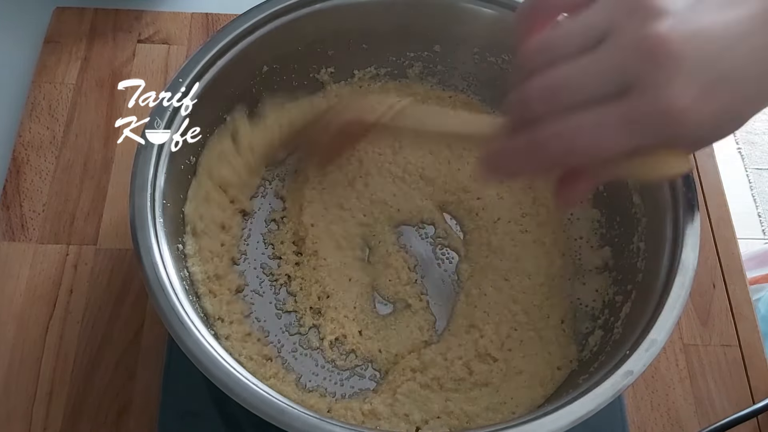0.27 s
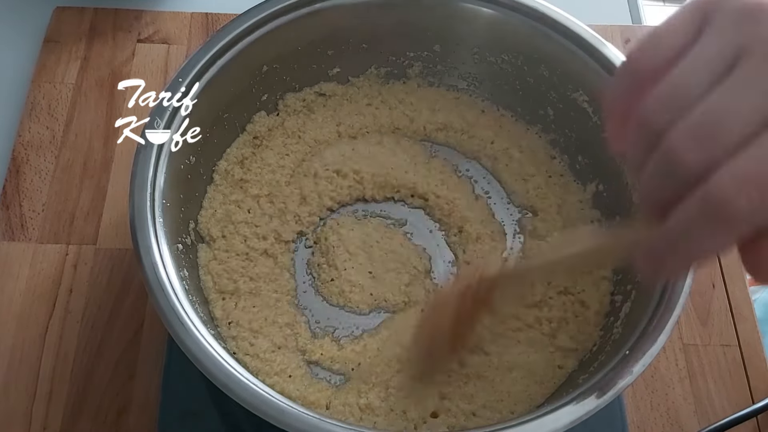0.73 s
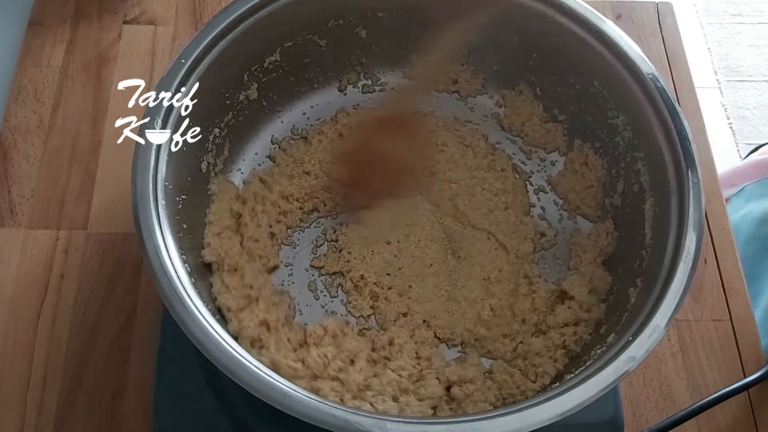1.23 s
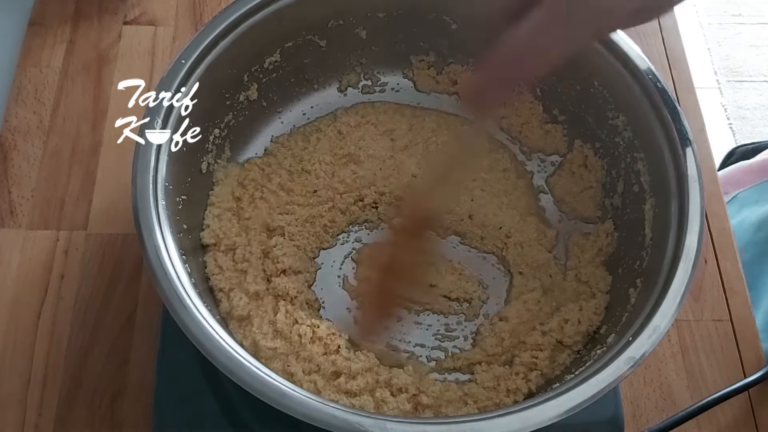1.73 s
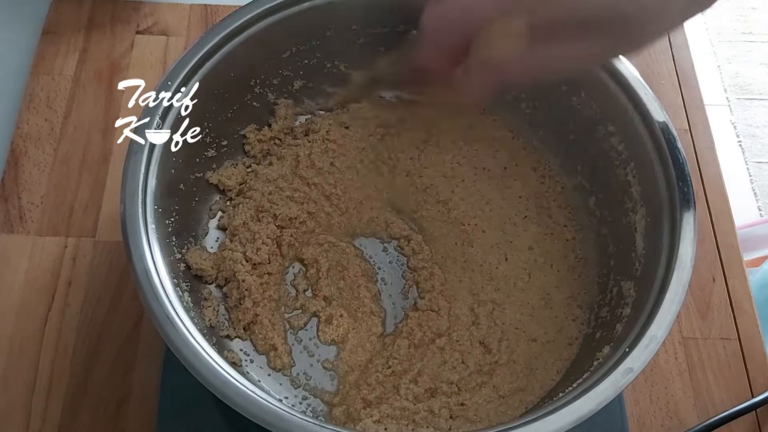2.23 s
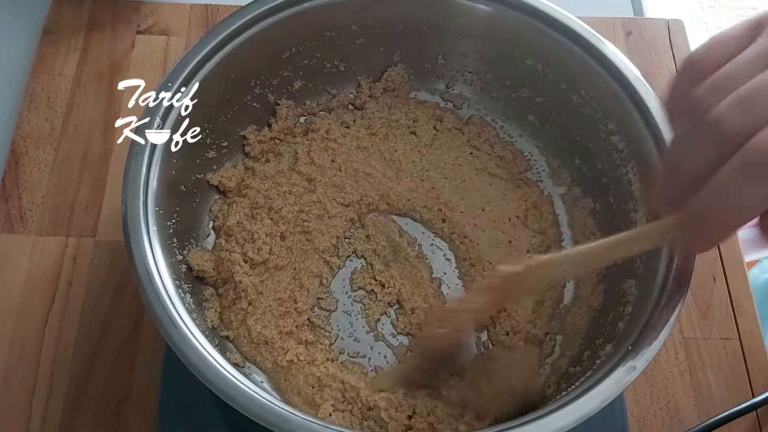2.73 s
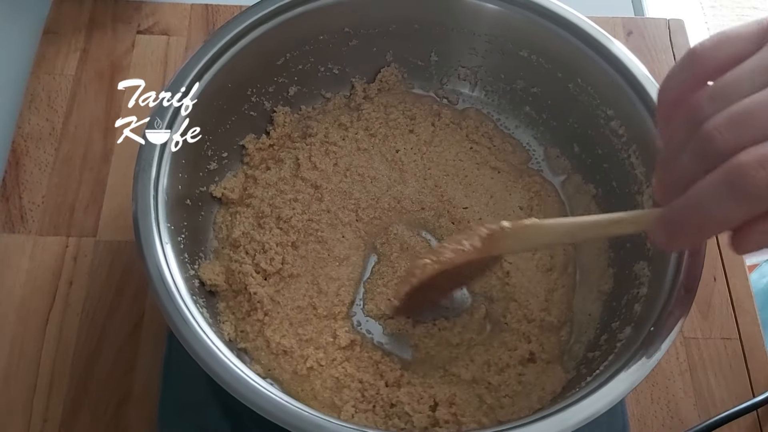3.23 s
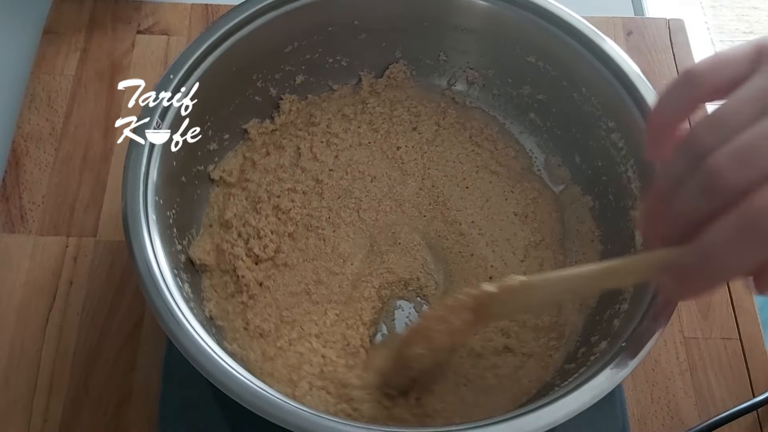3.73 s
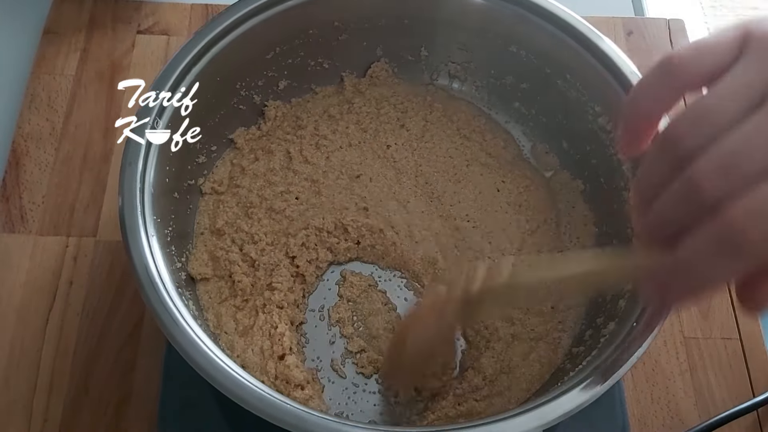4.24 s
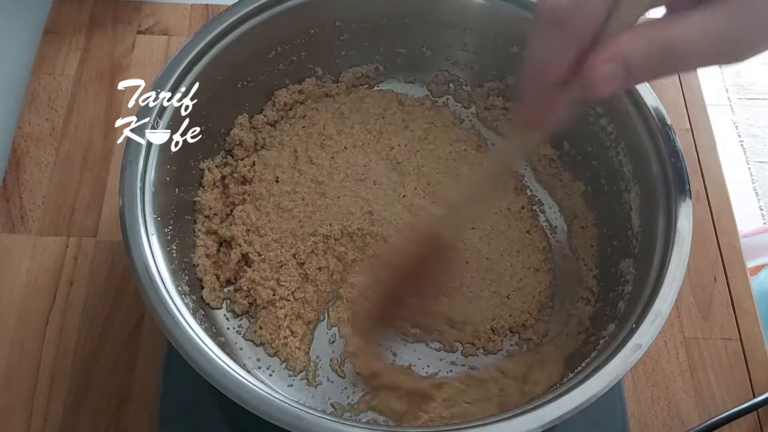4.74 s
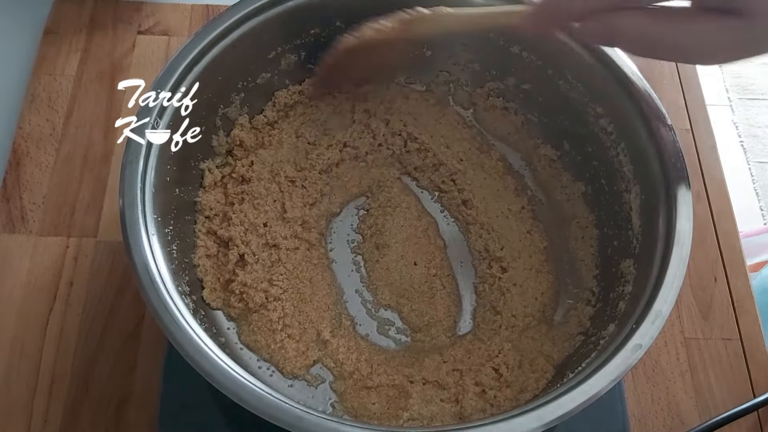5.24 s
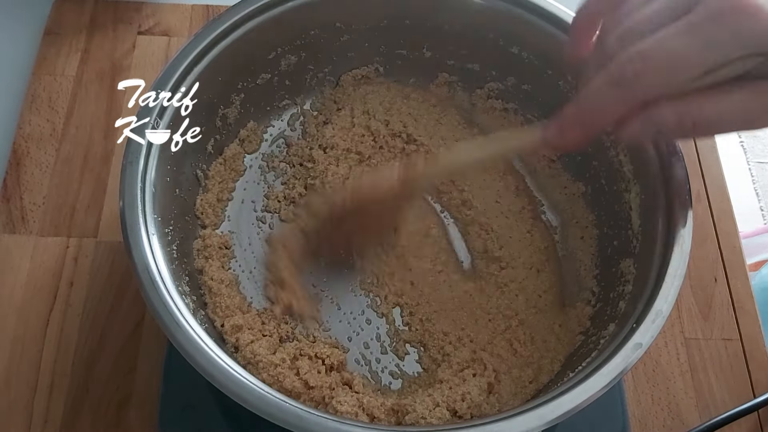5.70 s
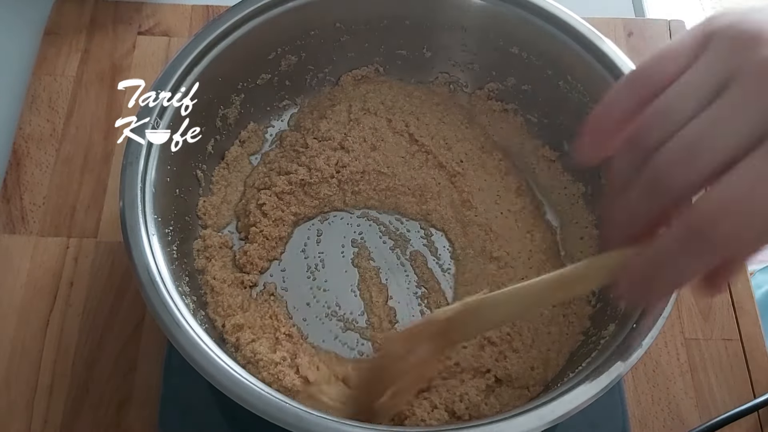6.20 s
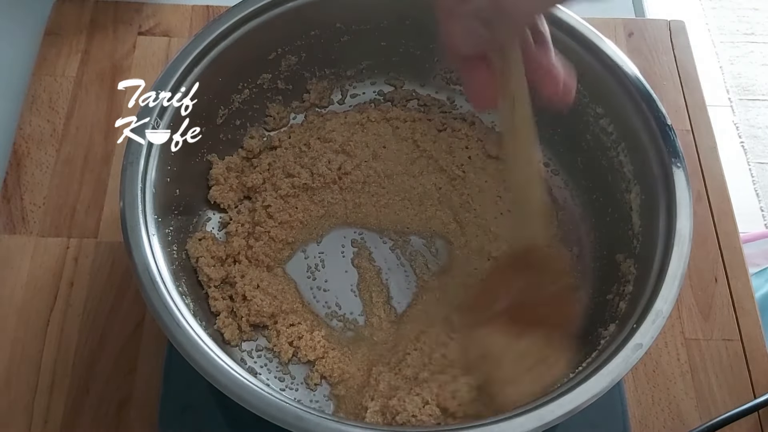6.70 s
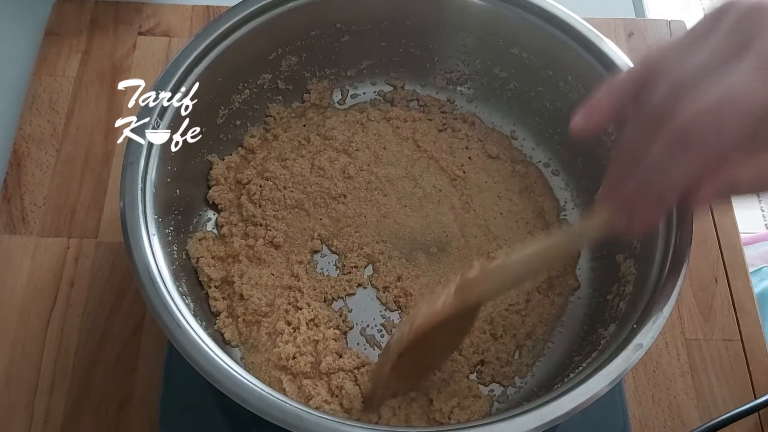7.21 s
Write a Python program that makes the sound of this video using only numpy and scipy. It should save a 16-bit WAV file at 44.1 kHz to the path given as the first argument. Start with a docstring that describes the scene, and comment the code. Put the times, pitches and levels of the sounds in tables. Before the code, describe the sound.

Butter sizzles close by in a steel pot throughout, a fine fizz that flares as a wooden spoon turns toasting semolina onto the hot metal. Short grainy rasps and light knocks fill the first second and a half. From about 1.1 to 1.7 seconds, a soft low draught brushes the right side of the microphone. Grit scrapes on bare steel around 2.4 seconds. The sizzle eases between 3 and 4 seconds, where the strongest dull bump lands at 3.3 with a brief juddering groan, followed by low rubbing. At 4.4 the handle clacks sharply on the rim and the sizzle surges. Another low judder at 5.2 leads into a second clack and bump at 5.3. Stirring continues with small ticks, a firm thud at 6.3, a gritty scrape around 6.6 and a softer knock at 7.3. The small kitchen adds a short ring.

```python
"""Butter sizzles close by in a steel pot as a wooden spoon stirs toasting semolina.
Steam bubbles simmer throughout and flare wherever the spoon turns fresh paste onto hot steel.
Grain rasps under the spoon, which drags and judders over the bottom, bumps the wall and
twice clacks on the rim. A draught brushes the right microphone port; a small kitchen rings."""
import sys
import numpy as np
from scipy import signal
from scipy.fft import rfft, irfft
from scipy.io import wavfile

SR = 44100
rng = np.random.default_rng(int(sys.argv[2]) if len(sys.argv) > 2 else 0)


def inscribe(sig):
    """Save sig as 16-bit PCM at rate SR to the path in sys.argv[1].

    A 1-D sig is mono; a 2-D sig holds one channel per row.
    Samples are clipped to [-1, 1] before scaling.
    """
    pcm = np.round(np.clip(np.atleast_2d(sig).T, -1, 1) * 32767)
    wavfile.write(sys.argv[1], SR, pcm.astype(np.int16))


N = 328986
T = np.arange(N) / SR

# spectra of the noise sources: (frequency [Hz], relative density [dB])
SIZZLE_SPECTRUM = [(240, -23.5), (400, 5), (496, -5), (597, 0), (932, -8.5), (1700, -3), (2500, -5.5),
                   (4340, -4), (6000, -4), (7300, -1.5), (8670, -4.5), (12700, -1.5), (15800, -4.5)]
SIMMER_SPECTRUM = [(300, 12), (900, -4.5), (3000, -12), (5000, -2.5), (6600, 1.5), (8200, 3), (11000, 3.5),
                   (15800, 1)]
DRAG_SPECTRUM = [(30, -35), (60, -11), (100, 8), (135, 1.5), (225, -5), (330, 4.5), (410, -5), (490, -10.5),
                 (680, -15.5), (1100, -41)]
CLACK_SPECTRUM = [(300, -2.5), (1000, -15), (4600, -10.5), (5600, -5), (6500, 3), (7500, 4), (8500, -2.5),
                  (14000, -8)]
TICK_SPECTRUM = [(300, 12.5), (900, 1.1), (2000, 13), (3200, 8), (4600, 9.9), (9000, 7.5), (15800, 2.8)]
DRAUGHT_SPECTRUM = [(20, -40), (55, 1.5), (80, -1.5), (120, -1.5), (185, -13), (400, -35.5), (1500, -75.5)]
# simmer resonances: (centre [Hz], width [Hz], gain [dB])
SIMMER_PEAKS = [(1720, 320, -2), (4290, 280, 3.5), (7414, 150, 12.5), (14500, 600, -7)]
# modes of the pot on its base and of its steel wall: (frequency [Hz], level [dB], t60 [s])
POT_MODES = [(97, -27, 0.16), (136, -22, 0.16), (191, -27.5, 0.17), (257, -14.5, 0.047), (312, 0, 0.075),
             (354.4, -4, 0.096), (416, -9.5, 0.092), (465, -11, 0.1), (532, -8, 0.12), (599, -7.5, 0.13),
             (679, -4, 0.089), (760, -5.5, .06), (1220, -4, 0.045)]
WALL_MODES = [(845, -12, .25), (1477, -10, .33), (1716, -12, .2), (2352, -11, .3), (2730, -15, .18),
              (3270, -13, .16), (4043, -12, .16), (5488, -11, .2), (5838, -9, .24), (6105, -9, .26),
              (6330, -11, .22), (6885, -9, .2), (7200, -10, .2), (7719, -8, .18)]

# Event levels are relative within each table; sigma is the half length of a Gaussian swell.
# air on the right port: (centre time [s], level [dB], sigma [s])
AIR_PUFFS = [(1.127, -32, 0.012), (1.244, -30.5, 0.028), (1.347, -25, 0.012), (1.417, -23.5, 0.02),
             (1.492, -35.5, 0.088), (1.666, -25.5, 0.023)]
# spoon turns fresh paste onto hot steel: (start [s], rise [s], length [s], sizzle level [dB])
SPOON_SWEEPS = [(0.0, 0.034, 0.2, -50), (0.223, 0.12, 0.2, -45), (0.445, 0.07, 0.62, -49),
                (1.104, 0.02, 0.57, -47), (1.728, 0.19, 0.27, -46), (2.172, 0.033, 0.32, -46.5),
                (2.525, 0.049, 0.37, -50.5), (3.29, 0.17, 0.67, -59.5), (3.855, 0.06, 0.24, -54),
                (4.106, 0.064, 0.13, -51), (4.349, 0.038, 0.43, -45.5), (4.803, 0.068, 0.28, -48.5),
                (5.334, 0.014, 0.095, -47), (5.45, 0.017, 0.34, -53.5), (5.702, 0.033, 0.24, -52),
                (5.946, 0.15, 0.14, -50.5), (6.13, 0.13, 0.28, -50.5), (6.378, 0.14, 0.41, -48),
                (7.029, 0.03, 0.089, -52.5), (7.279, 0.046, 0.14, -51.5)]
# grit on bare steel: (centre time [s], level [dB], sigma [s], pitch [Hz])
GRIT_SCRAPES = [(1.28, -56, 0.16, 5400), (1.33, -52.5, 0.11, 12000), (2.37, -51.5, 0.18, 5860),
                (2.46, -45, .022, 10900), (4.47, -47, 0.067, 5940), (5.78, -57.5, 0.15, 5670),
                (6.63, -50.5, 0.16, 6360), (6.64, -46, .06, 11000)]
# grain under the spoon: (centre time [s], level [dB], sigma [s], pitch [Hz], width [Hz])
GRAIN_RASPS = [(0.123, -45.5, 0.013, 1480, 1200), (0.186, -42.5, 0.026, 1750, 850),
               (0.327, -49, 0.036, 1600, 1790), (0.44, -45.5, 0.042, 1200, 1000),
               (0.555, -46, .011, 750, 990), (0.725, -44, 0.023, 1220, 1700),
               (0.801, -41, 0.018, 1860, 690), (1.31, -46.5, 0.016, 1800, 447),
               (1.601, -40, 0.013, 2950, 600), (2.05, -51, 0.011, 2750, 350),
               (2.448, -47, 0.024, 4420, 400), (2.822, -62, .07, 1230, 1200), (3.62, -66, 0.2, 770, 300),
               (3.55, -63, 0.04, 1900, 700), (3.927, -51.5, 0.02, 2450, 1190),
               (4.223, -52.5, 0.026, 1850, 1230), (4.816, -49, 0.02, 1270, 150)]
# harder rubs over the bottom: (centre time [s], level [dB], sigma [s])
SPOON_RUBS = [(1.063, -52.5, 0.61), (1.795, -49.5, 0.049), (2.416, -47.5, 0.12), (2.834, -48.5, 0.1),
              (3.5, -47, 0.15), (3.825, -44.5, 0.1), (4.164, -47, 0.1), (4.53, -45, 0.061),
              (4.772, -45, 0.075), (5.47, -44, 0.089), (6.056, -49, 0.076), (6.45, -49.5, 0.19),
              (6.733, -46.5, 0.1)]
# stick-slip groans: (centre time [s], level [dB], sigma [s], slip rate [Hz])
SPOON_JUDDERS = [(3.3, -34.5, 0.029, 135), (3.52, -43, 0.03, 335), (5.204, -46, 0.062, 95)]
# spoon hits the pot: (time [s], level [dB], contact [ms], ring pitch [Hz], rebound level [dB])
SPOON_BUMPS = [(0.300, -32, 2.1, 313.4, -2), (0.9014, -32, 0.47, 313.7, -1), (1.423, -32.5, 1.9, 322.6, -2),
               (1.476, -31.5, 1.15, 309.6, -1.5), (2.231, -40.5, 0.64, 321, -2),
               (2.669, -36.5, 0.95, 318.6, -7), (3.259, -17.5, 2.84, 320.6, -7),
               (4.380, -29, 0.6, 314, -3.5), (4.4085, -26.5, 2.2, 311, -4), (4.714, -37.5, 1.5, 321, -5),
               (5.368, -26, 2.04, 310.5, -6.5), (5.975, -32, 2.8, 328, -11.5),
               (6.311, -22.5, 2.35, 313, -3.5), (6.524, -38.5, 1.5, 339, -4.5),
               (7.326, -30.5, 2.2, 334, -5.5)]
# rebounds after each bump: (delay [ring cycles], level [dB])
SPOON_REBOUNDS = [(3, -3), (8, 0), (11, -1), (17, -6)]
# handle on the rim: (time [s], level [dB], decay [ms], pitch [Hz])
RIM_CLACKS = [(4.378, -15, 7.3, 5500), (4.384, -22.5, 6.1, 6330), (5.3411, -14, 3.1, 6700),
              (5.345, -20.5, 5.1, 7000)]
# spoon edge on bare steel: (time [s], level [dB], decay [ms])
EDGE_TICKS = [(0.542, -31, 4.5), (1.454, -30, 3.2), (2.665, -35.5, 7.2), (5.746, -39.5, 8.4),
              (6.305, -34, 12), (7.148, -33.5, 8.1)]
# brief dips in overall level: (centre time [s], depth [dB], sigma [s])
LEVEL_DIPS = [(5.463, 11, 0.0022), (7.016, 9.5, 0.0039)]

HOLLOW_HZ, HOLLOW_WIDTH_HZ = 638, 54  # air resonance in the pot
POT_RING_HZ = 312  # main pot mode
DRYING_DB_PER_S, RESTING_CRACKLE_DB = 71.5, -68
GLIDE_DB = -54.5
FORCE_LEAD_S, MIN_REBOUND_CONTACT_MS = .005, 1.65
RIGHT_LAG_SAMPLES = 7
LOW_CUT_HZ, HIGH_CUT_HZ = 42, 15850


def undb(db):
    """Decibels to gain."""
    return np.exp(np.asarray(db) * (np.log(10) / 20))


def unit_rms(x):
    """Scale to rms 1."""
    return x / np.sqrt(np.mean(x ** 2))


def pan(db):
    """Stereo gains for a left-minus-right level."""
    return undb(np.array([[db], [-db]]) / 2)


def convolve(x, response):
    """Apply an impulse response; at most N samples."""
    return signal.fftconvolve(np.atleast_2d(x), np.atleast_2d(response), axes=1)[:, :N]


def colour(x, spectrum, size=4096):
    """Minimum-phase filter of unit power through (Hz, dB) points."""
    hz, db = np.transpose(spectrum)
    bins_hz = np.maximum(np.arange(size // 2 + 1) * SR / size, 1)
    gain = undb(np.interp(np.log(bins_hz), np.log(hz), db))
    cepstrum = irfft(np.log(gain))
    response = irfft(np.exp(rfft(2 * cepstrum[:size // 2], size)))
    return convolve(x, response / np.linalg.norm(response))


def band(x, hz, width_hz):
    """One resonance, gain 1 at centre."""
    return signal.lfilter(*signal.iirpeak(hz, hz / width_hz, fs=SR), x)


def modal_response(modes, twist_rad):
    """Decaying modes of alternating sign; finer patterns reach the two ports more out of phase."""
    t = T[:SR // 2]
    sides = np.array([[1], [-1]])
    response = 0
    for k, (hz, db, t60_s) in enumerate(modes):
        skew_rad = sides * np.minimum(twist_rad * (hz / 1000) ** 2, np.pi / 4)
        decay = undb(db - 60 * t / t60_s)
        response = response + (-1) ** k * decay * np.cos(2 * np.pi * hz * t + skew_rad)
    return response


def noise():
    """White noise."""
    return rng.standard_normal(N)


def pops(rate_hz, spread_db):
    """Random impulses of uneven size, rms 1."""
    fires = rng.random(N) < rate_hz / SR
    size = undb(spread_db * np.minimum(rng.exponential(size=N), 4))
    return unit_rms(fires * size * noise())


def stereo(source, correlation):
    """Two channels sharing part of a random source."""
    return np.sqrt(correlation) * source() + np.sqrt(1 - correlation) * np.array([source(), source()])


def flutter(rate_hz, depth_db):
    """Randomly wandering factor around 1."""
    steps = rng.standard_normal(4096)
    return undb(depth_db * np.interp(T * rate_hz, np.arange(len(steps)), steps))


def bursts(contacts):
    """Envelope of sudden onsets with exponential decay."""
    return sum(undb(db) * (T >= at_s) * np.exp(-np.clip((T - at_s) * 1000 / decay_ms, 0, 50))
               for at_s, db, decay_ms in contacts)


def swell(at_s, sigma_s):
    """Gaussian envelope, peak 1."""
    return np.exp(-.5 * np.minimum(((T - at_s) / sigma_s) ** 2, 100))


def kitchen(x, wet_db, t60_s, build_s):
    """Add dense reflections from worktop and walls, different at each port."""
    t = T[:SR // 2]
    onset = np.minimum(t / build_s, 1) ** 2
    tail = rng.standard_normal((2, len(t))) * undb(-60 * t / t60_s) * onset
    return x + undb(wet_db) * convolve(x, tail / np.linalg.norm(tail, axis=1, keepdims=True))


def draught():
    """Air buffets the right port, barely the left."""
    gusts = sum(undb(db) * swell(at_s, sigma_s) for at_s, db, sigma_s in AIR_PUFFS)
    return colour(stereo(noise, correlation=.28), DRAUGHT_SPECTRUM) * gusts * undb([[-18], [-1]])


def simmer():
    """Steady fizz of steam bubbles bursting in the butter."""
    fizz = stereo(lambda: pops(rate_hz=20000, spread_db=1.5), correlation=.17)
    peaks = sum(undb(db) * band(fizz, hz, width_hz) for hz, width_hz, db in SIMMER_PEAKS)
    return unit_rms(colour(fizz, SIMMER_SPECTRUM) + peaks) * undb(-53)


def flare_envelope():
    """Sizzle rises as a sweep bares hot steel, holds while the spoon moves, fades as paste dries."""
    power = undb(RESTING_CRACKLE_DB) ** 2
    for start_s, rise_s, length_s, db in SPOON_SWEEPS:
        rise = np.clip((T - start_s) / rise_s, 0, 1)
        drying_s = np.maximum(T - start_s - length_s, 0)
        power = power + (rise * undb(db - DRYING_DB_PER_S * drying_s)) ** 2
    return np.sqrt(power)


def sizzle():
    """Fresh paste on hot steel: steam bubbles burst faster and louder with each flare."""
    flare = flare_envelope()
    rate_hz = 30000 * np.sqrt(flare / flare.max())
    bubbles = stereo(lambda: pops(rate_hz, spread_db=0), correlation=.1)
    hiss = colour(bubbles, SIZZLE_SPECTRUM) * flare * flutter(rate_hz=80, depth_db=1.53) * undb(3.5)
    # the hollow favours the right port in the midrange
    return hiss + band(hiss, hz=1380, width_hz=900) * np.array([[-.25], [.25]])


def bubble_clusters(x):
    """Clusters of like-sized bubbles come and go: each treble band wanders on its own."""
    return x + sum(band(x, hz, hz / 5) * (flutter(rate_hz=30, depth_db=1.8) - 1)
                   for hz in np.geomspace(2000, 14000, 10))


def scrapes():
    """Dry grit scratches bare steel, in a different broad band each stroke."""
    grit = stereo(noise, correlation=.13)
    out = 0
    for at_s, db, sigma_s, hz in GRIT_SCRAPES:
        scratch = band(band(grit, hz, hz / 2), hz, hz / 2)
        out = out + unit_rms(scratch) * undb(db) * swell(at_s, sigma_s)
    return out


def rasps():
    """Grains stick and slip between wood and steel; each stroke has its pitch and sounds the hollow."""
    slips = pops(rate_hz=5000, spread_db=1.5)
    slips = colour(slips, [(200, -23), (640, 3.5), (930, -4.5), (3200, -5), (4800, -12.5), (12000, -39)])
    hollow = unit_rms(band(slips, HOLLOW_HZ, HOLLOW_WIDTH_HZ)) * undb(-10)
    out = 0
    for at_s, db, sigma_s, hz, width_hz in GRAIN_RASPS:
        coupling = min(2 * HOLLOW_HZ / hz, 1) ** 2  # high squeaks hardly reach the hollow
        stroke = unit_rms(band(slips, hz, width_hz)) + hollow * coupling
        out = out + stroke * undb(db) * swell(at_s, sigma_s)
    return out * pan(-6)


def drag():
    """The dragged spoon rumbles the pot and its hollow: a light glide, swelling with each rub."""
    friction = stereo(lambda: pops(rate_hz=900, spread_db=-.5), correlation=.94)
    hollow = unit_rms(band(friction, HOLLOW_HZ, 2 * HOLLOW_WIDTH_HZ)) * undb(-22)
    rub_power = sum((undb(db) * swell(at_s, sigma_s)) ** 2 for at_s, db, sigma_s in SPOON_RUBS)
    pressure = np.sqrt(undb(GLIDE_DB) ** 2 + rub_power)
    return (colour(friction, DRAG_SPECTRUM) + hollow) * pressure * pan(-1.9)


def judders():
    """The spoon sticks and slips at a low, unsteady rate and shakes the pot."""
    waver = flutter(rate_hz=40, depth_db=1.26)
    out = 0
    for at_s, db, sigma_s, slip_hz in SPOON_JUDDERS:
        groan = np.sqrt(2) * np.sin(2 * np.pi * np.cumsum(slip_hz * waver) / SR)
        out = out + groan * undb(db) * swell(at_s, sigma_s)
    return out * pan(-1.1)


def contact_force(delay_s, contact_ms):
    """Bell-shaped force of unit impulse; longer contact sounds duller."""
    force = swell(FORCE_LEAD_S + delay_s, sigma_s=contact_ms / 4000)[:SR // 10]
    return force / force.sum()


def bumps():
    """Paste-cushioned blows with soft rebounds; each rings the pot at its own pitch."""
    out = np.zeros((2, N + SR))
    is_overtone = [hz > 1.25 * POT_RING_HZ for hz, *_ in POT_MODES]
    for at_s, db, contact_ms, ring_hz, rebound_db in SPOON_BUMPS:
        force = contact_force(0, contact_ms)
        rebound_ms = max(contact_ms, MIN_REBOUND_CONTACT_MS)
        for cycles, fall_db in SPOON_REBOUNDS:
            delay_s = (cycles + .04 * rng.standard_normal()) / ring_hz
            force = force + undb(rebound_db + fall_db) * contact_force(delay_s, rebound_ms)
        # each spot on the pot favours other overtones
        spot_db = 2 * rng.standard_normal(len(POT_MODES)) * is_overtone
        modes = [(hz * ring_hz / POT_RING_HZ, mode_db + offset_db, t60_s)
                 for (hz, mode_db, t60_s), offset_db in zip(POT_MODES, spot_db)]
        thud = convolve(force, modal_response(modes, twist_rad=1.15))
        start = int((at_s - FORCE_LEAD_S) * SR)
        out[:, start:start + thud.shape[1]] += undb(db) * thud
    out = out + band(out, HOLLOW_HZ, width_hz=300) * (pan(3.6) - 1)  # overtones lean left
    return out[:, :N] * pan(-1.5) * undb(6)


def clacks_and_ticks():
    """The handle chatters on the rim, the spoon edge ticks on steel; both ring the wall."""
    rattle = stereo(noise, correlation=.4)
    chatter = sum((.5 * rattle + undb(1) * band(rattle, hz, width_hz=980)) * bursts([(at_s, db, ms)])
                  for at_s, db, ms, hz in RIM_CLACKS)
    clacks = colour(chatter, CLACK_SPECTRUM) * pan(-1.4)
    ticks = colour(stereo(noise, correlation=.19) * bursts(EDGE_TICKS), TICK_SPECTRUM) * pan(-2.2)
    blows = noise() * bursts([contact[:3] for contact in RIM_CLACKS + EDGE_TICKS])
    wall = convolve(blows, modal_response(WALL_MODES, twist_rad=.38))
    return clacks + ticks + undb(-39) * wall


def scene():
    """Frying and blows ring in the kitchen; the pot reaches the left port first; the draught is dry."""
    frying = bubble_clusters(sizzle() + simmer() + scrapes()) + rasps()
    frying = kitchen(frying, wet_db=-16, t60_s=.14, build_s=.002) * undb(1.82)
    thuds = kitchen(bumps(), wet_db=-12, t60_s=.25, build_s=.015)
    knocks = kitchen(clacks_and_ticks(), wet_db=-7, t60_s=.13, build_s=.0057)
    left, right = frying + drag() + judders() + thuds + knocks
    pot = np.array([left, np.pad(right, (RIGHT_LAG_SAMPLES, 0))[:N]])
    dip_db = sum(db * swell(at_s, sigma_s) for at_s, db, sigma_s in LEVEL_DIPS)
    return (pot + draught()) * undb(-dip_db)


def record(dry):
    """Thin the deepest bass, cut the top steeply."""
    highpass = signal.butter(2, LOW_CUT_HZ, "highpass", fs=SR, output="sos")
    lowpass = signal.ellip(10, .2, 70, HIGH_CUT_HZ, fs=SR, output="sos")
    return signal.sosfilt(lowpass, signal.sosfilt(highpass, dry))


dry = scene()
out = record(dry)
inscribe(out)
```